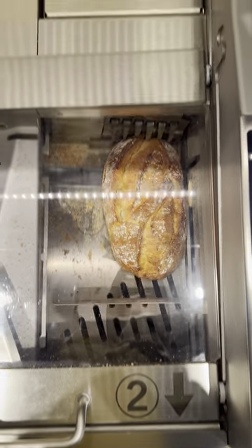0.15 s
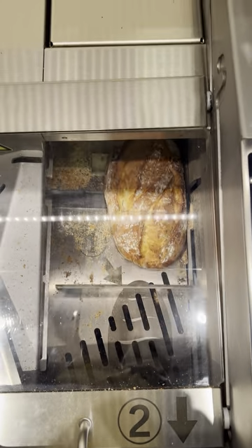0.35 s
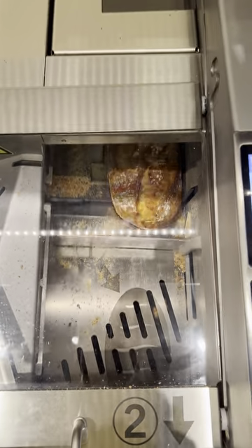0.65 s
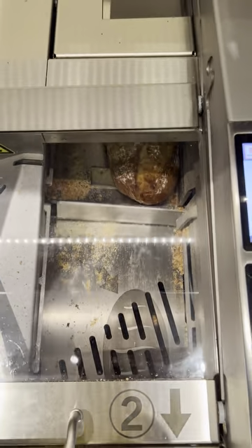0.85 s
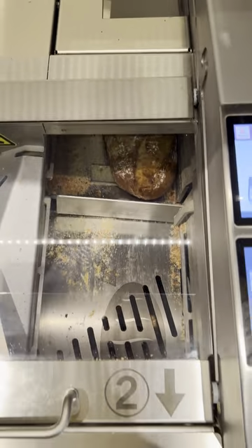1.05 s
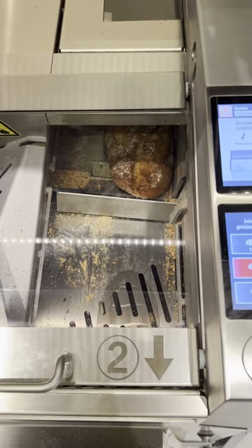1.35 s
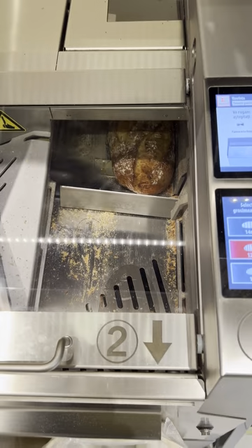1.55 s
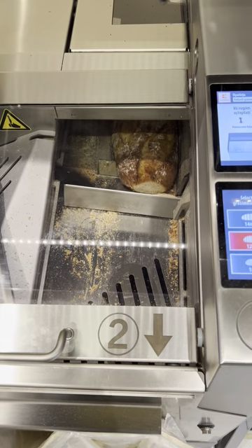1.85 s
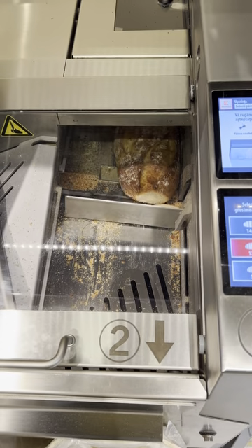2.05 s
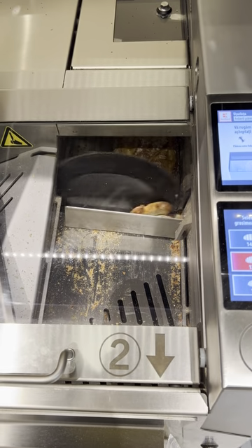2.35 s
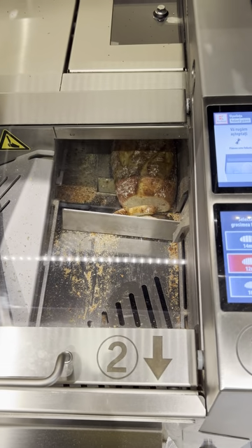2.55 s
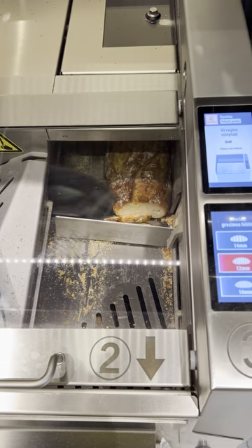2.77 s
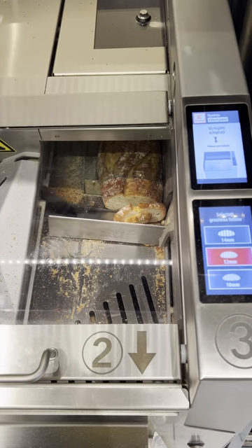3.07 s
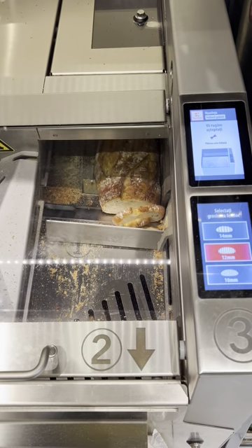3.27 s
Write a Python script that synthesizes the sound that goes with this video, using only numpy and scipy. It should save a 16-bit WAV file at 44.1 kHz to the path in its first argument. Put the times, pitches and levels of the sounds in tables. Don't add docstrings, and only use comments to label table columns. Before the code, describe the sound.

A bread slicer, close-miked in a shop. Fans and a steady feed-motor hum until a dull scrape and hard clunk at 0.87 s, then catch rattle and sliding rumble to 1.1. A relay ticks and the drive starts near 1.27; a sheet-metal flap clacks at 1.4. Crunchy, ringing cuts tear crust at 1.6, 2.2, 2.8 and 3.4, with softer crumb rubbing, gear whine and blade whirr between.

```python
import sys
import numpy as np
from scipy import signal
from scipy.fft import rfft, irfft, next_fast_len
from scipy.io import wavfile
from scipy.ndimage import map_coordinates

SR = 44100
rng = np.random.default_rng(int(sys.argv[2]) if len(sys.argv) > 2 else 0)


def unload_wav(signal):
    wavfile.write(
        sys.argv[1],
        SR,
        np.round(np.clip(np.atleast_2d(signal).T, -1, 1) * 32767).astype(np.int16),
    )


def boost_factor(decibels):
    exponent = np.asarray(decibels, float) / 20
    return 10 ** exponent


N = 150381
T = np.arange(N) / SR

# frequency in Hz, density in dB per Hz.
SHOP_COLOUR = [(25, -21), (50, -7), (190, -5), (350, -11.5), (600, -21.5), (2400, -27), (8000, -39),
               (16000, -50.5)]
# frequency in Hz, likeness from 0 to 1.
SHOP_LIKENESS = [(150, 1), (900, 0.43), (4000, 0.047), (6000, 0.84)]
# frequency in Hz, lead of the left port in radians.
LEFT_LEAD = [(0, 0), (300, -.2), (1500, -.3), (2050, .4), (2400, 3.4), (3700, 4.3), (4500, 3.3),
             (5000, 2.2), (5900, 3.14), (10250, 9.42), (12300, 12.57), (14800, 15.7), (17000, 18.2)]
# frequency in Hz, likeness from 0 to 1.
MACHINE_LIKENESS = [(300, 1), (750, 0.66), (1100, 0.7), (1750, 0.64), (2700, 0.23), (3800, 0.095),
                    (5700, 0.9), (12000, 0.97)]
# frequency in Hz, left over right in dB.
LEFT_LEAN = [(100, 0), (700, 2.6), (3000, 0), (6000, -1), (12000, 0)]

# centre in seconds, level in dB, length in seconds.
SCRAPES = [
    (.822, -57, 0.0036),
    (.85, -43, 0.0042),
    (1.265, -49, .025),
    (2.541, -35, 0.044),
    (3.102, -35, .025),
    (3.364, -33.5, 0.021),
]
# frequency in Hz, density in dB per Hz.
SCRAPE_COLOUR = [(700, -32), (1600, -7), (2400, 2), (4300, -2.5), (5500, -9), (16000, -40)]

# start in seconds, peak in dB, decay t60 in seconds.
CLUNKS = [
    (.868, -22, .05),
    (.876, -20.5, 0.032),
    (.887, -25.5, 0.05),
    (.913, -33.5, 0.11),
    (1.401, -15, 0.064),
    (1.41, -18, 0.045),
    (1.419, -27, 0.072),
]
# frequency in Hz, level in dB, t60 in seconds.
STOP_MODES = [(1094, -9, 0.087), (1366, -2.5, 0.093), (1804, 5, 0.077), (2220, -14, .07)]
# frequency in Hz, level in dB, t60 in seconds.
FLAP_MODES = [(903, -7, 0.082), (1000, -4, 0.066), (1220, -7, 0.047), (1508, 4.5, 0.058), (1700, -8, .06),
              (2470, -14, .07), (4330, -2, 0.044)]
# frequency in Hz, density in dB per Hz.
THUD_COLOUR = [(450, -36), (850, -6), (1700, -1), (3650, -11.5), (8000, -19.5), (13000, -22.5),
               (16000, -22)]
# start in seconds, peak in dB.
CHATTER = [(0.949, -33.5), (0.9776, -24), (1.0063, -20.5), (1.025, -27), (1.0545, -32), (1.0924, -39.5)]
# frequency in Hz, level in dB, t60 in seconds.
CATCH_MODES = [(2960, -12, .04), (3940, 4, .04), (4540, 5, 0.045), (7140, 0, .05), (8040, 2, 0.046),
               (8830, 1.5, 0.044)]
# start in seconds, peak in dB.
RELAY_TICKS = [
    (1.1923, -40),
    (1.284, -31.5),
]

# frequency in Hz, width in Hz, level in dB.
SLIDE_MODES = [(84, 29.5, 3), (175, 45, -3), (239, 25, -1), (331.7, 42, -1.5)]
# frequency in Hz, width in Hz, level in dB.
DRIVE_MODES = [(66, 24, -1), (96.3, 42, -3.5), (139, 18.7, -7), (186, 19.7, -7), (266, 30, -7.5)]
# frequency in Hz, density in dB per Hz.
RUMBLE_COLOUR = [(150, -25), (330, 1.5), (430, -9.5), (650, -10.5), (1000, -20.5), (3000, -34.5),
                 (6000, -58)]
# start in seconds, level in dB.
PUSHES = [
    (.876, -32),
    (1.267, -25.5),
    (2.018, -26),
    (2.64, -31),
    (3.224, -25.5),
]
# frequency in Hz, level in dB, rise in seconds, t60 in seconds.
PUSHER_MODES = [(186, 1.5, 0.012, 0.51), (252, -4, 0.02, 0.28), (302.5, 2.5, 0.048, 0.41)]
# centre in seconds, frequency in Hz, level in dB, length in seconds.
LURCHES = [(0.891, 70, -38, 0.024), (0.963, 88.5, -25, 0.023), (1.046, 107.2, -27.5, 0.033),
           (1.123, 186, -28, 0.035), (1.386, 97.8, -20, 0.014), (1.412, 62.8, -28.5, 0.032),
           (1.476, 139.8, -25, 0.053), (1.667, 79.6, -29, 0.059), (1.712, 139, -30.5, 0.064),
           (1.967, 63, -29.5, 0.1), (2.27, 66, -28, 0.056), (2.56, 65.4, -29.5, 0.072),
           (3.054, 90, -24, 0.047), (3.164, 64, -28.5, .08)]
# centre in seconds, frequency in Hz, level in dB, length in seconds.
GROANS = [(0.893, 326.5, -24.5, 0.016), (0.958, 330, -29, 0.012), (1.038, 331.2, -27, 0.06),
          (1.311, 320, -24.5, 0.016), (1.344, 335, -25.5, 0.011), (1.637, 316.4, -32.5, 0.056),
          (2.259, 316.3, -21.5, 0.047), (2.698, 320.5, -20.5, .015), (2.87, 325, -23, 0.026)]

# frequency in Hz, density in dB per Hz.
SPIN_COLOUR = [(350, -32), (700, -3), (2300, -2.5), (3200, -4), (4300, 1), (5400, -16), (7000, -12.5),
               (16000, -14)]
# frequency in Hz, width in Hz, level in dB.
DISC_WHIRR = [(2300, 300, 1.5), (4300, 270, -7), (6710, 160, 13.5), (12300, 600, 6)]
# centre in seconds, swell in dB, length in seconds.
SWINGS = [
    (1.53, 9, 0.11),
    (2.1, 4.5, 0.13),
    (2.7, 6.5, 0.087),
    (3.269, 6.5, 0.063),
]
# frequency in Hz, width in Hz, level in dB.
GEAR_MESH = [(1002, 23, 3.5), (1990, 42, -2.5), (4100, 150, -1)]
# centre in seconds, swell in dB, length in seconds.
GEAR_LOADS = [
    (1.572, 9, 0.033),
    (1.817, 6, 0.06),
    (2.27, 1, .04),
    (2.97, 9, 0.029),
]

# start in seconds, crust level in dB, crust length in seconds, crumb level in dB,
# bite in seconds.
CUTS = [
    (1.595, -21.5, 0.065, -32.5, 0.0035),
    (2.18, -18.5, 0.074, -31.5, 0.014),
    (2.771, -19, 0.095, -30.5, 0.015),
    (3.375, -19.5, .09, -31, 0.0059),
]
# start in seconds, level in dB.
CRACKS = [
    (1.6, -17.5),
    (1.636, -21),
    (2.215, -32),
    (2.79, -28),
    (2.85, -19.5),
]
# centre in seconds, level in dB.
EXITS = [
    (1.899, -32.5),
    (2.537, -46),
    (2.553, -43),
    (3.115, -45),
]
# frequency in Hz, density in dB per Hz.
CRUST_COLOUR = [(450, -5), (1250, -19), (2300, 0), (3200, -7), (4500, -3.5), (8000, -3), (14500, -1.5),
                (16200, -3)]
# frequency in Hz, density in dB per Hz.
CRUMB_COLOUR = [(350, -2.5), (700, -3.5), (2300, -1), (3200, -3.5), (4200, 2.5), (5400, -12.5), (6700, -7),
                (16000, -6.5)]
# frequency in Hz, width in Hz, level in dB.
DISC_MODES = [
    [(2023, 23, 2), (4570, 45, -3), (5390, 16, 6.5), (6210, 20, 6), (7360, 24, 0), (8800, 33, -13),
     (11060, 41, -5), (12600, 90, -16), (13100, 99, -3)],
    [(2350, 270, -2.5), (4520, 82, 2.5), (4640, 31, -12), (5190, 48, -0.5), (7100, 46, -8.5),
     (8240, 30, -21), (8450, 35, -13), (9260, 30, -3), (12050, 97, -9), (12630, 150, -5)],
    [(2315, 93, 2.5), (2500, 31, 2), (4340, 58, 1.5), (7180, 100, -5), (8750, 36, -2), (8750, 64, -15),
     (11930, 220, -13), (12700, 52, -9)],
]
# frequency in Hz, t60 in seconds.
CABINET_DECAY = [(200, 0.54), (2000, 0.13), (10000, 0.041)]


def unit(x):
    return x / np.sqrt(np.mean(x ** 2) + 1e-20)


def along(points, hz):
    f, v = np.transpose(points)
    return np.interp(np.log(hz + 1), np.log(f + 1), v)


def wobble(rate):
    return map_coordinates(rng.standard_normal(int(N * rate / SR) + 4), [T * rate])


def bell(s, length):
    return np.exp(-((T - s) / length) ** 2)


def swells(rows):
    return sum(db * bell(s, length) for s, db, length in rows)


def ramp(s, rise):
    return np.clip((T - s) / rise, 0, 1)


def fall(after, t60):
    return boost_factor(-60 * np.maximum(T - after, 0) / t60)


def filtered(x, response):
    m = next_fast_len(N + SR // 2)
    return irfft(rfft(x, m) * response(np.fft.rfftfreq(m, 1 / SR)), m)[..., :N]


def colour(points):
    return lambda f: boost_factor(along(points, f))


def peaks(rows):
    def response(f):
        total = 0
        for k, (centre, width, db) in enumerate(rows):
            damping = 1j * f * width
            total = total + (-1) ** k * boost_factor(db) * damping / (centre * centre - f * f + damping)
        return total
    return response


def disc_colour(points, ring):
    return lambda f: boost_factor(along(points, f)) * (1 + ring * peaks(DISC_WHIRR)(f))


def hiss(response, grain_db=0):
    x = rng.standard_normal((3, N)) * boost_factor(grain_db * wobble(900))
    return unit(filtered(x, response))


def patchy(x, patchy_db, hz, s):
    z = signal.stft(x, nperseg=256)[2]
    across = np.arange(z.shape[1]) * SR / 256 / max(hz, 260)
    onward = np.arange(z.shape[2]) * 128 / SR / max(s, .016)
    places = np.meshgrid(across, onward, indexing="ij")
    field = map_coordinates(rng.standard_normal((90, 220)), places)
    return unit(signal.istft(z * boost_factor(patchy_db * field), nperseg=256)[1][:, :N])


def strike(s, modes):
    t = np.arange(SR // 4) / SR
    ring = 0
    for hz, db, t60 in modes:
        ring = ring + boost_factor(db + rng.normal(0, 2) - 60 * t / t60) * np.sin(2 * np.pi * hz * t)
    ring = ring * (1 - np.exp(-t / 0.001))
    return np.pad(ring, (round(s * SR), N))[:N]


def ports(x, alike, lead):
    def mix(f):
        likeness = np.clip(along(alike, f), 0, 1)
        shared, own = np.sqrt(likeness), np.sqrt(1 - likeness)
        lean = along(LEFT_LEAN, f) / 2
        turn = np.exp(.5j * np.interp(f, *np.transpose(lead)))
        left = [shared * turn, own, 0 * f]
        right = [shared / turn, 0 * f, own]
        return np.array([left, right]) * boost_factor([lean, -lean])[:, None]
    return filtered(x, mix).sum(axis=1)


def shop():
    level_db = -35.5 + 0.17 * wobble(3.34) + 2.7 * bell(0.38, 0.22) - 1.67 * np.minimum(T, 1.3)
    air = boost_factor(level_db) * patchy(hiss(colour(SHOP_COLOUR)), 2.03, hz=382, s=0.1206)
    return ports(air, SHOP_LIKENESS, LEFT_LEAD)


def feed_motor():
    lag = np.array([[-.55], [.55]])
    hum = np.sin(2 * np.pi * 499.5 * T + lag)
    return boost_factor(-37.5 + 1.0 * wobble(10.4)) * hum * fall(.87, 0.035)


def scrapes():
    level = sum(boost_factor(db) * bell(s, length) for s, db, length in SCRAPES)
    return level * hiss(colour(SCRAPE_COLOUR), grain_db=1.5)


def flap():
    rung, puff = np.zeros((2, N))
    for s, db, t60 in CLUNKS:
        rung += boost_factor(db - 9.5) * strike(s, FLAP_MODES if s > 1.2 else STOP_MODES)
        puff += boost_factor(db - 9.0) * np.clip((T - s) / 0.0027 + 1, 0, 1) * fall(s + 0.0038, t60)
    return rung * [[1], [.5], [.5]] + puff * hiss(colour(THUD_COLOUR))


def bright_hiss():
    return hiss(colour([(500, 9), (3000, 7.5), (9000, -0.5), (16000, -18)]))


def rumble():
    return boost_factor(-7.5) * patchy(hiss(colour(RUMBLE_COLOUR), grain_db=2.5), 3.8, hz=269, s=0.054)


def carriage_slide(broad):
    on_s, off_s = .874, 1.135
    level = boost_factor(-21.5 - 19.5 * (T - on_s))
    return ramp(on_s, 0.0042) * fall(off_s, .17) * level * (hiss(peaks(SLIDE_MODES)) + 0.66 * broad)


def case_tone(hz, sway_hz, sway):
    return np.sqrt(2) * np.sin(2 * np.pi * hz * T + sway_hz * sway)


def pusher(sway):
    knocks = 0
    for s, db in PUSHES:
        for hz, level, rise, t60 in PUSHER_MODES:
            envelope = ramp(s, rise) * fall(s + rise, t60)
            knocks = knocks + boost_factor(db + level) * envelope * case_tone(hz, 4.36, sway)
    return knocks * [[1], [.3], [.3]]


def lurches_and_groans(sway):
    moves = 0
    for s, hz, db, length in LURCHES + GROANS:
        moves = moves + boost_factor(db) * bell(s, length) * case_tone(hz, 2.72, sway)
    return moves * [[1], [.3], [.3]]


def catch():
    rung, snap = np.zeros((2, N))
    for s, db in CHATTER:
        rung += boost_factor(db - 8.5) * strike(s, CATCH_MODES)
        snap += boost_factor(db - 7.5) * (T > s) * fall(s, 0.12)
    return rung * [[1], [.5], [.5]] + snap * bright_hiss()


def relays():
    tick = sum(boost_factor(db + 4.5) * (T > s) * fall(s, 0.014) for s, db in RELAY_TICKS)
    thin = np.diff(bright_hiss(), n=2, prepend=[[0, 0]] * 3)
    return tick * thin


def drive(broad):
    on_s = 1.265
    build = np.clip((T - on_s) / 0.13, .3, 1)
    return ramp(on_s, 0.013) * boost_factor(-30 + 0.49 * wobble(6.1)) * (hiss(peaks(DRIVE_MODES)) + 1.3 * build * broad)


def spin_up():
    return ramp(1.288, 0.1)


def spinning_disc():
    whirr = patchy(hiss(disc_colour(SPIN_COLOUR, 0.9), grain_db=2.0), 2.2, hz=506, s=0.057)
    return spin_up() * boost_factor(-42.5 + swells(SWINGS) + 0.95 * wobble(17)) * whirr


def gears(crumb_level):
    mesh = patchy(hiss(peaks(GEAR_MESH)), 3.1, hz=582, s=.07)
    load = (0.62 + crumb_level / boost_factor(-39)).clip(0, 1.2)
    return spin_up() ** 3 * load * boost_factor(-43 + swells(GEAR_LOADS)) * mesh


def panel(sway):
    hz = 330.3
    song = case_tone(hz, 5.33, sway) * boost_factor(6.8 * wobble(20))
    breath = 0.38 * hiss(lambda f: peaks([(hz, 53, 0)])(f) ** 2)
    deep = sum(bell(cut[0] + 0.24, 0.12) for cut in CUTS)
    return ramp(1.5, 0.08) * boost_factor(-32.5 - deep) * (song + breath)


def cut_levels(cut):
    s, crust_db, length, crumb_db, bite = cut
    hard = ramp(s, bite) * boost_factor(crust_db) * fall(s + length, 0.14)
    soft = ramp(s, bite) * boost_factor(crumb_db + 2.5 * bell(s + 0.2, 0.033)) * fall(s + 0.25, 0.3)
    return hard, soft


def crust():
    tear = sum(cut_levels(cut)[0] for cut in CUTS)
    cracks = sum(boost_factor(db) * ramp(s, 0.0039) * fall(s + 0.0043, 0.16) for s, db in CRACKS)
    noise = patchy(hiss(disc_colour(CRUST_COLOUR, 0.067), grain_db=1.5), 2.15, hz=590, s=.025)
    return np.hypot(tear, cracks) * boost_factor(1.1 * wobble(70)) * noise


def crumb_rub():
    return sum(cut_levels(cut)[1] for cut in CUTS) + sum(boost_factor(db) * bell(s, 0.013) for s, db in EXITS)


def crumb(level):
    noise = patchy(hiss(disc_colour(CRUMB_COLOUR, 0.92), grain_db=2.5), 3.7, hz=466, s=.04)
    return level * boost_factor(0.74 * wobble(45)) * noise


def blade_ring():
    teeth = rng.standard_normal((3, N)) * boost_factor(1.46 * wobble(29.95))
    ring = 0
    for cut, modes in zip(CUTS, DISC_MODES + DISC_MODES[-1:]):
        hard, soft = cut_levels(cut)
        ring = ring + filtered(teeth * (hard + soft), peaks(modes))
    return boost_factor(6.5) * ring


def cabinet(x):
    hz, t, z = signal.stft(rng.standard_normal((3, SR // 3)), SR, nperseg=256)
    decay = boost_factor(-60 * t / along(CABINET_DECAY, hz)[:, None])
    tail = signal.istft(z * decay, SR, nperseg=256)[1]
    return signal.fftconvolve(x, tail / np.linalg.norm(tail[0]), axes=1)[:, :N]


def scene():
    crumb_level = crumb_rub()
    sharp = scrapes() + flap() + catch() + relays()
    sharp = sharp + spinning_disc() + gears(crumb_level) + crust() + crumb(crumb_level) + blade_ring()
    broad = rumble()
    sway = 2 * np.pi * np.cumsum(wobble(25.11)) / SR
    case = carriage_slide(broad) + pusher(sway) + lurches_and_groans(sway) + drive(broad) + panel(sway)
    machine = sharp + boost_factor(-6.5) * cabinet(sharp) + case
    return ports(machine, MACHINE_LIKENESS, LEFT_LEAD) + shop() + feed_motor()


def roll_off(x):
    return signal.sosfilt(signal.butter(12, 16330, fs=SR, output="sos"), x)


def record(dry):
    mix = filtered(dry, lambda f: (f < 15880) / (1 + (40 / (f + 1)) ** 6))
    return roll_off(mix)


dry = scene()
out = record(dry)
unload_wav(out)
```